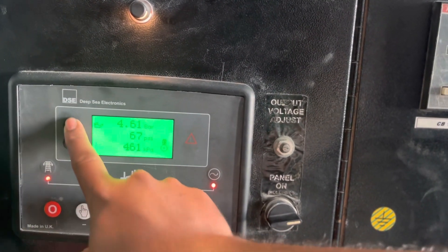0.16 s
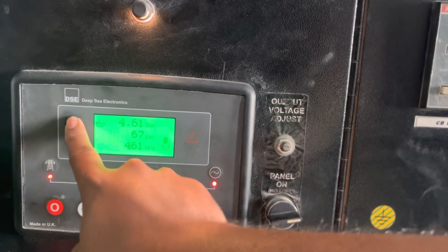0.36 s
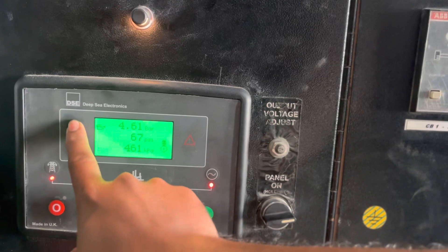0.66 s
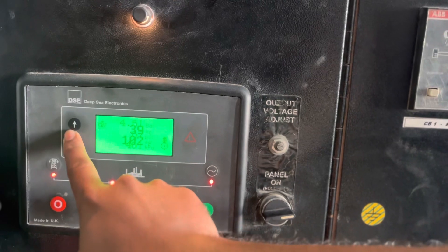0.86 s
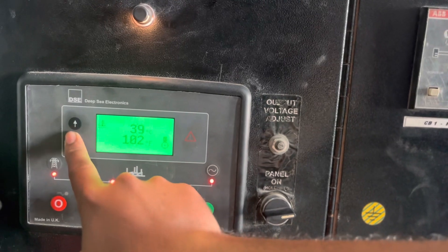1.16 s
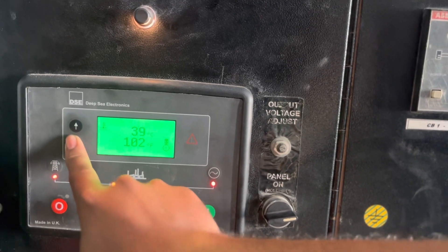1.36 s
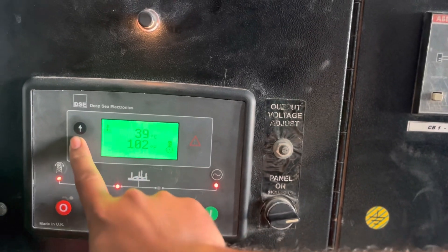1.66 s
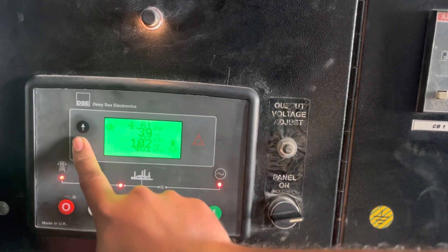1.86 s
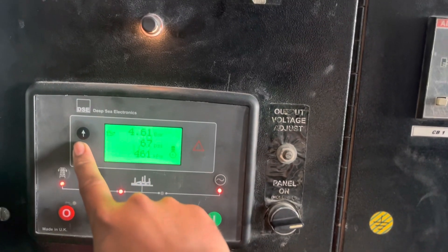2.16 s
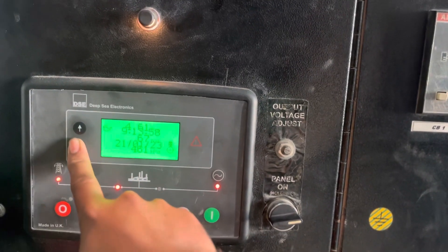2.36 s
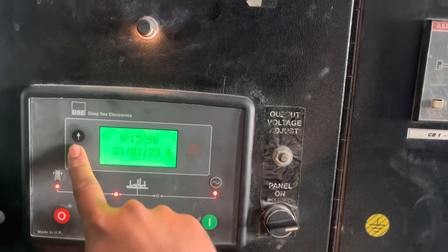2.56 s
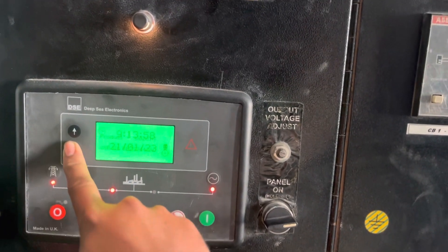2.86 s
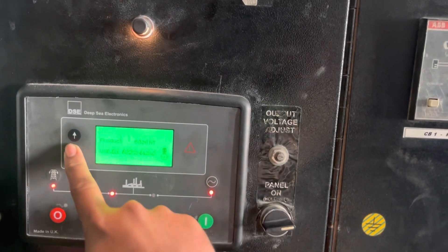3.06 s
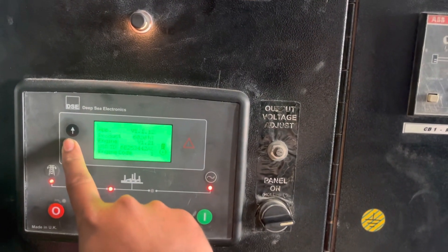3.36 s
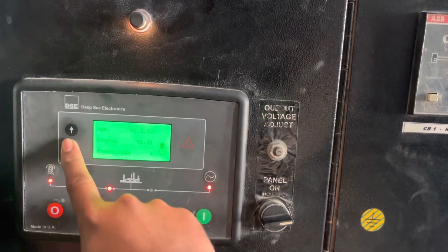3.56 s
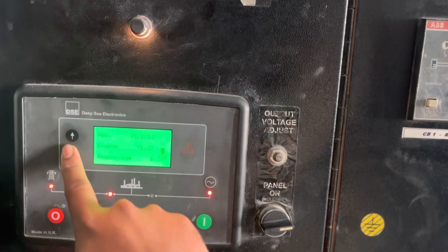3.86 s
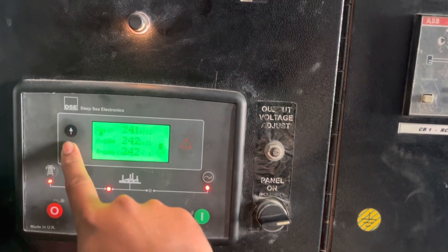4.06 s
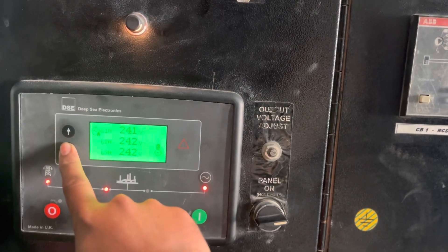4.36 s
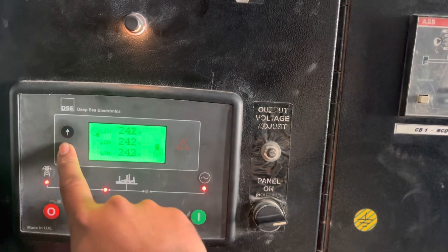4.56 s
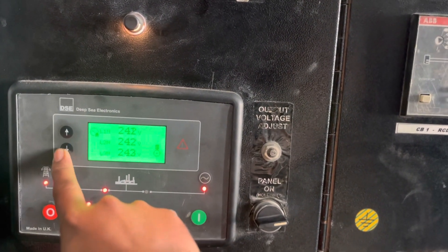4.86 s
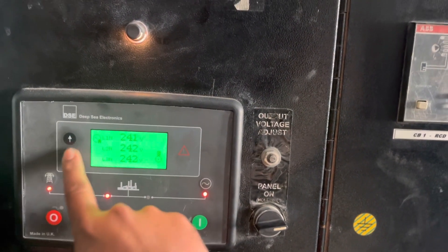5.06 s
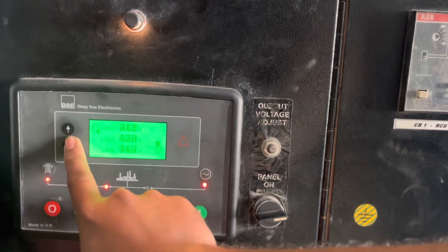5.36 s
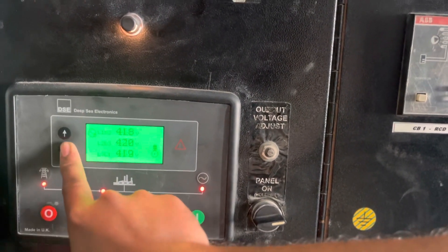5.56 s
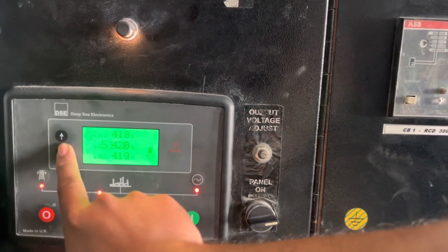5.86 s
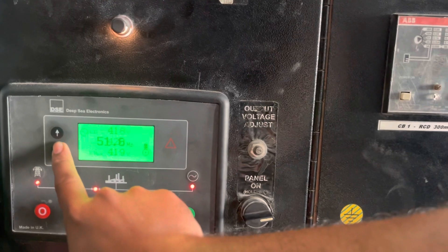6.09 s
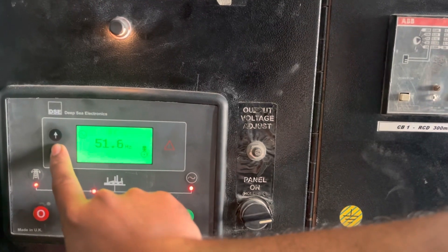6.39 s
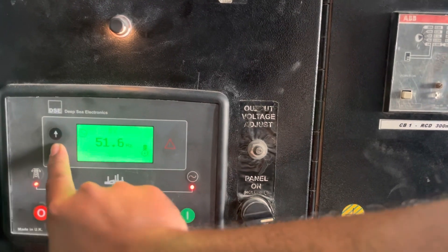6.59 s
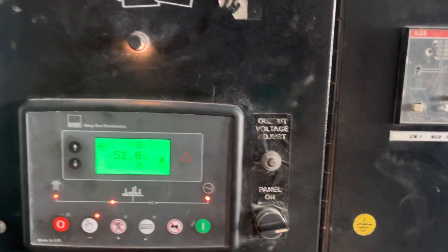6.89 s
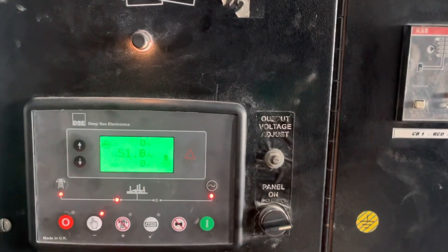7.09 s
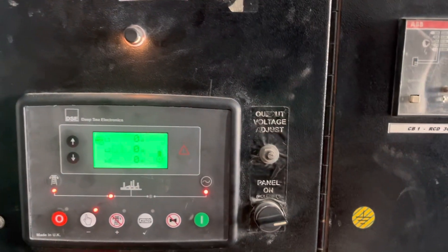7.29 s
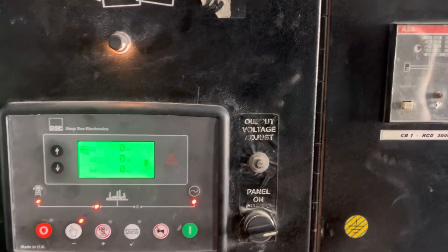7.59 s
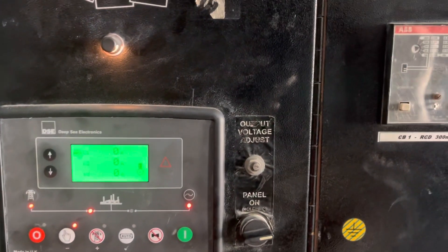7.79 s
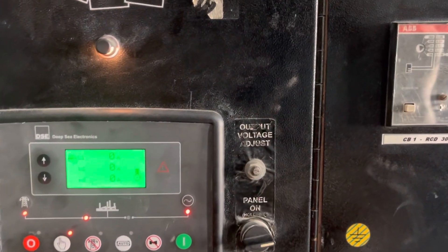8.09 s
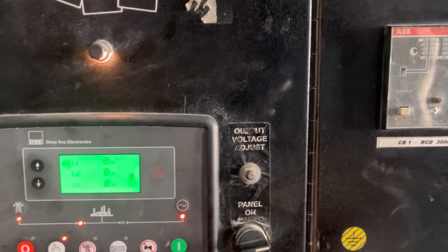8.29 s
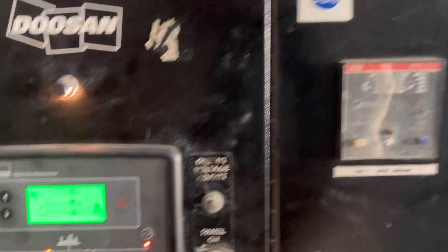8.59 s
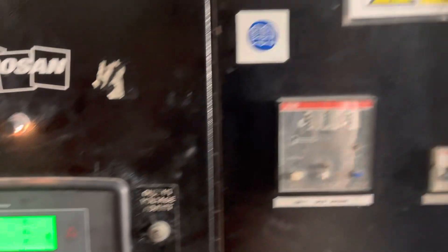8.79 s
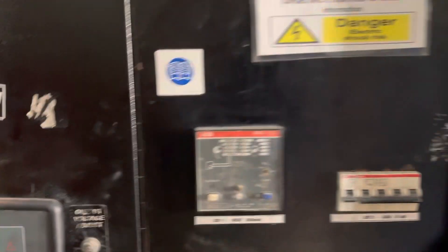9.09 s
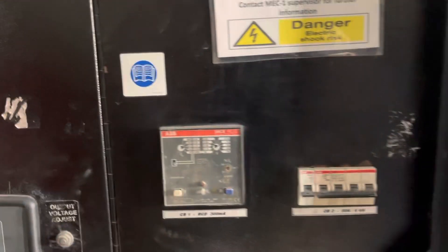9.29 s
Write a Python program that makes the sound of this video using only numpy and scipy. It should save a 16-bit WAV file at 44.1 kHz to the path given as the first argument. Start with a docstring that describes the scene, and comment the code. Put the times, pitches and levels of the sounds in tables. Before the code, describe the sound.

A steady four-cylinder diesel engine heard in stereo from a close handheld microphone at its steel canopy. Low body boom, mid-range sheet-metal hum, fan whir and broadband hiss are continuous, overlaid with blurred clatter and a very fast metallic rattle. Speed never changes. Late on, one harder tick is followed by a small squeak and a brief rough scrape; in the last second the panel hum drops while diffuse wall reflections remain.

```python
"""By the control panel of a four-cylinder diesel generator that runs at governed speed in its steel canopy.
Engine orders, sines locked to the crank, hum through the sheet metal; filtered noise adds rumble and clatter.
A loose part rattles once a turn as struck resonances; a belt-driven fan drones in sines and hisses in noise.
Late on the loose part gives one harder, brighter tick, then come a faint squeak and a faint scrape.
Near the end the microphone drifts away along the panel and the panel hum fades."""
import sys
import numpy as np
from scipy import signal
from scipy.fft import rfft, irfft, next_fast_len
from scipy.io import wavfile
from scipy.ndimage import uniform_filter1d

SR = 44100
rng = np.random.default_rng(int(sys.argv[2]) if len(sys.argv) > 2 else 0)


def master_out(mix):
    """Clip the mix to full scale and print it as 16-bit PCM to the path in sys.argv[1]."""
    frames = np.transpose(np.atleast_2d(mix))
    ceiling = np.clip(frames, -1, 1)
    pcm = np.round(ceiling * 32767).astype(np.int16)
    wavfile.write(sys.argv[1], SR, pcm)


N = 416304

TURNS_PER_S = 25.7996  # mean crank speed
FAN_HZ = 36.66  # fan fundamental
HUM_DB, LEAN_DB, RATTLE_DB, UPPER_DB = 1, 2, 3, 4  # columns of the microphone path in place()


def amp(db):
    """Level to amplitude: 20 dB is a factor of ten."""
    return np.exp(np.asarray(db) * np.log(10) / 20)


def read(points, hz):
    """Linear interpolation of a table along a logarithmic frequency axis."""
    f, value = np.transpose(points)
    return np.interp(np.log(hz + 1), np.log(f + 1), value)


def place(column):
    """Position dependence of the near field: one column of the microphone path, per sample."""
    # drift of the microphone along the panel:
    # t/s, panel hum level/dB, panel left-right lean/dB, rattle level/dB, upper-order level/dB
    path = [(0, -0.5, -0.5, -6, -4), (.6, -1.5, 1, -7.5, -3), (1.2, 0.5, 0, -1.5, -1.5),
            (2.5, 0, 0.7, 0, 0), (6.6, 0, -0.5, 0.5, 1), (7.1, -1, 3, -0.5, 0), (8.3, -2.5, 3.5, -0.5, 0),
            (8.8, -6, 1, 0, -1.5), (9.44, -8, 0.5, -4, -16)]
    rows = np.transpose(path)
    return np.interp(np.arange(N) / SR, rows[0], rows[column])


def boom_db():
    """Body radiation against position: falls with the square of the panel hum change in dB."""
    return -.041 * place(HUM_DB) ** 2


def wash_db():
    """Reflected against direct sound: the wall wash rises .21 dB per dB of panel hum lost."""
    return -.21 * place(HUM_DB)


def wander(top_hz):
    """Random modulation of unit rms by superposition of slow sines in random phase."""
    t = np.arange(0, N + 64, 64) / SR
    rates = np.geomspace(top_hz / 8, top_hz, 12)
    slow = sum(np.sin(2 * np.pi * (f * t + rng.random())) for f in rates) / np.sqrt(6)
    return np.interp(np.arange(N) / SR, t, slow)


def coloured(white, spectrum):
    """Spectral shaping: multiplies white noise of unit power by a spectral density in dB per Hz."""
    size = next_fast_len(N)
    gain = amp(read(spectrum, np.fft.rfftfreq(size, 1 / SR)))
    return irfft(rfft(white, size) * gain * np.sqrt(SR / 2), size)[..., :N]


def ports(shared, unrelated):
    """Interchannel coherence: two microphone ports hear a frequency-dependent mix of two sounds."""
    # likeness of left and right: f/Hz, correlation [0 to 1]
    likeness = [(60, 0.93), (250, 0.93), (500, 0.93), (1000, 0.099), (2500, 0.38), (5000, 0.051),
                (7000, 0.53), (7700, 1), (10200, 0.67), (12000, 0.29)]
    # phase by which left leads right: f/Hz, lead/rad
    phase_lead = [(0, 0), (260, .2), (1210, 2.2), (2500, -.5), (4570, -.6), (5600, -3.2), (6370, -3.4),
                  (7320, -1.9), (7670, -.1), (10200, .1), (16000, .1)]
    # left-right balance: f/Hz, level difference/dB
    balance = [(60, -3), (110, 0.5), (200, -10), (380, -16), (700, -4), (1290, -1.5), (2380, -1.5),
               (4400, -5), (8120, 0), (15000, 2)]
    size = next_fast_len(N)
    hz = np.fft.rfftfreq(size, 1 / SR)
    a, b = rfft(shared, size), rfft(unrelated, size)
    same = np.clip(read(likeness, hz), 0, 1)
    # each port takes half of the level and phase difference
    tilt = amp(read(balance, hz) / 2) * np.exp(.5j * read(phase_lead, hz))
    left = a * tilt
    right = (same * a + np.sqrt(1 - same ** 2) * b) / tilt
    return irfft(np.array([left, right]), size)[:, :N]


def crank():
    """Rotation at constant mean speed plus slow phase sway: crank angle in turns."""
    # the governor lets the crank run ahead or behind: t/s, lead [turns]
    sway = [(0, -.003), (.7, -.008), (1.3, -.009), (2.3, -.003), (3.05, .011), (3.5, .006), (4.1, -.008),
            (4.35, -.008), (4.7, -.002), (5.1, -.003), (5.6, .003), (6, .003), (6.6, -.005), (7.3, .003),
            (7.8, .001), (8.5, -.008), (9.1, -.028), (9.44, -.031)]
    first_turn_s = .0327  # nominal time of the first rattle
    t = np.arange(N) / SR
    lead = uniform_filter1d(np.interp(t, *np.transpose(sway)), size=6000)
    return (t - first_turn_s) * TURNS_PER_S + lead


def order_phase(k, hz):
    """Dispersion: starting phase in radians of the order with k cycles per two turns."""
    if hz < 275:
        # in the body, the higher the order, the later it leaves
        body_hz, body_lag = 51.6, .000123  # lag in s per Hz
        # orders between the firing orders arrive late, and their upper half orders inverted
        off_firing_s, invert_hz = .00155, 155
        late = 2 * hz * off_firing_s * (k % 4 > 0)
        return -np.pi * (body_lag * (hz - body_hz) ** 2 + late + (k % 2) * (hz > invert_hz))
    if not 350 < hz < 575:
        return 2 * np.pi * rng.random()
    # the panel rings around panel_hz, and higher orders leave it later
    panel_hz, panel_lag, flip_hz = 441, .000335, 490  # lag in s per Hz
    # past flip_hz the phase advances half a cycle per whole order, one cycle at most
    flip = np.clip((hz - flip_hz) / TURNS_PER_S, 0, 2)
    # half orders stand a quarter wave off: alternate turns differ in timing, not in strength
    start = np.pi * (flip - k % 2 / 2 - panel_lag * (hz - panel_hz) ** 2) - .25
    return start - np.pi / 2 if hz > 530 else start


def hum(turns):
    """Harmonic radiation of a periodic engine: low orders boom from the body, high ones ring in the panel."""
    # engine orders before changes with place and chance:
    # multiple of the turn rate, level/dB, left-right difference/dB
    turn_orders = [(2.0, -24.3, 0), (2.5, -48.2, -2), (3.0, -33.9, 1), (3.5, -40.5, -1), (4.0, -27.4, -1),
                   (4.5, -48.4, 0), (5.0, -49.2, -4), (5.5, -44.7, -1), (6.0, -37.3, -2), (6.5, -45.7, -1),
                   (7.0, -58.6, 2), (7.5, -49.5, -1), (8.0, -30.4, -1), (8.5, -39.5, -1), (9.0, -38.5, 1),
                   (9.5, -56.2, 4), (10.0, -32.8, -2), (10.5, -48.3, 2), (11.0, -44.4, 2),
                   (11.5, -55.3, -5), (12.0, -47.0, -8), (12.5, -60.6, -7), (13.0, -48.2, -2),
                   (13.5, -49.5, -1), (14.0, -33.1, -3), (14.5, -47.0, 0), (15.0, -31.0, -3),
                   (15.5, -41.1, -8), (16.0, -31.7, 1), (16.5, -40.1, -2), (17.0, -30.2, -1),
                   (17.5, -45.8, -5), (18.0, -33.7, -6), (18.5, -45.2, -4), (19.0, -31.2, -3),
                   (19.5, -42.4, -5), (20.0, -29.9, -3), (20.5, -46.6, -3), (21.0, -42.2, 4),
                   (21.5, -42.2, -3), (22.0, -46.2, -6), (22.5, -48.5, -1), (23.0, -44.6, -4),
                   (23.5, -53.1, -2), (24.0, -49.7, -3), (24.5, -56.6, 3), (25.0, -46.5, -8),
                   (26.0, -54.2, -6), (26.5, -54.5, 8), (27.0, -57.8, 6), (27.5, -62.2, 0), (28.0, -49, -2),
                   (28.5, -61.9, -3), (29.0, -57.2, 8), (30.0, -56.9, -7), (30.5, -57.9, 8),
                   (31.0, -60.8, -2), (31.5, -56.9, -4), (32.0, -57.3, -2), (32.5, -53.4, 3),
                   (33.0, -57.5, -8), (33.5, -58.8, -1), (34.0, -54.7, -3), (34.5, -60.4, -1),
                   (35.0, -59.3, 7), (35.5, -59.5, 3), (36.0, -58.0, -3), (36.5, -61.2, -1),
                   (37.0, -62.4, 8), (38.0, -54, 1), (39.0, -61.8, -7)]
    port_delay_s = .00029  # left ahead of right, full above 450 Hz
    flutter_db = -21  # each sideband at order 17; its amplitude grows with the order
    out = np.zeros((2, N))
    near_db, lean_db, upper_db = place(HUM_DB), place(LEAN_DB), place(UPPER_DB)
    body_db, wall_db = boom_db(), wash_db()
    beat = np.exp(2j * np.pi * (FAN_HZ - TURNS_PER_S) * np.arange(N) / SR)
    for turn, db, side_db in turn_orders:
        k = round(2 * turn)  # cycles per two turns; odd k is a half order
        hz = k * TURNS_PER_S / 2
        panel = np.clip((hz - 358) / 45, 0, 1) * (hz < 620)
        boom = np.clip((hz - 55) / 40, 0, 1) * (hz < 275)
        start = order_phase(k, hz)

        place_db = panel * near_db + boom * body_db
        place_db = place_db + (275 < hz < 335) * 2 * wall_db + (620 < hz < 760) * upper_db
        place_db = place_db + (hz > 760) * (2 * np.minimum(wall_db, .8) + body_db)
        chance_db = (.42 + k % 2) * min(k / 12, 1) * wander(5)
        level = np.sqrt(2) * amp(db + place_db + chance_db)

        lead = .1 + np.pi * hz * port_delay_s * min(hz / 450, 1)  # half the phase between ports
        port = amp(side_db / 2) * np.exp(1j * lead)
        gain = level / max(abs(port + 1 / port) / 2, .6)  # refers the level to the sum of both ports
        lean = abs(port) * amp(panel * lean_db / 2)
        wave = gain * np.exp(1j * (np.pi * k * turns + start))
        if k % 2 == 0 and 375 < hz < 760:
            # whole orders in the panel flutter at the beat of fan against crank
            up, down = np.exp(2j * np.pi * rng.random(2))
            wave = wave * (1 + amp(flutter_db) * turn / 17 * (up * beat + down / beat))
        out[0] += lean * (wave * np.exp(1j * lead)).real
        out[1] += (wave * np.exp(-1j * lead)).real / lean
    return out


def fan():
    """Harmonic tones of a belt-driven rotor, with random wavering of amplitude and phase."""
    # fan orders before wavering and place: multiple of the fan fundamental, level/dB
    fan_orders = [(2, -44), (3, -49), (4, -38.5), (5, -44), (6, -41), (7, -51), (23, -62)]
    t = np.arange(N) / SR - .0043
    tone = np.zeros(N)
    for k, db in fan_orders:
        level = amp(db + wander(3.0)) * np.sqrt(2)
        tone += level * np.cos(2 * np.pi * k * FAN_HZ * t + .15 * wander(2.5))
    return tone * amp(boom_db()) * np.ones((2, 1))


def rumble():
    """Random excitation of the body: uneven firings blur into low noise."""
    # spectrum before place and chance: f/Hz, level/dB [per Hz]
    body_spectrum = [(20, -72), (42, -70), (70, -62), (98, -50.5), (125, -58.5), (145, -57.5), (200, -60),
                     (240, -64.5), (300, -76.5), (500, -130)]
    return coloured(rng.standard_normal((2, N)), body_spectrum) * amp(boom_db() + .4 * wander(4.0))


def drone():
    """Random excitation of the panel: uneven firings blur into a band of noise."""
    # spectrum before place and chance: f/Hz, level/dB [per Hz]
    panel_spectrum = [(250, -120), (340, -70), (390, -63.5), (470, -61.5), (550, -65), (640, -77),
                      (900, -120)]
    return coloured(rng.standard_normal((2, N)), panel_spectrum) * amp(place(HUM_DB) + .68 * wander(8.9))


def hiss(turns):
    """Broadband noise, amplitude-modulated slightly once a turn and at random."""
    # spectrum of the broadband hiss: strong to 10 kHz, almost empty near 12-13.6 kHz, faint above:
    # f/Hz, level/dB [per Hz]
    hiss_spectrum = [(700, -110), (1200, -81), (2400, -79), (4000, -82), (5200, -86), (6700, -90),
                     (8000, -93), (9600, -90), (11000, -101), (11800, -124), (13600, -124), (14200, -106),
                     (15700, -102)]
    swell_db = .21 * np.cos(2 * np.pi * turns - .6) + .43 * wander(12)
    return coloured(rng.standard_normal((2, N)) * amp(swell_db), hiss_spectrum)


def wall_wash():
    """Diffuse reflection: engine noise returns from the workshop walls as steady coloured noise."""
    # spectrum before changes with place: f/Hz, level/dB [per Hz]
    wall_spectrum = [(180, -100), (285, -64.5), (335, -70), (420, -67.5), (600, -64.5), (850, -69.5),
                     (980, -68), (1200, -81.5), (1600, -130)]
    return coloured(rng.standard_normal((2, N)), wall_spectrum) * amp(wash_db())


def clatter(turns):
    """Cyclostationary noise: valve gear clatter that partly repeats each cycle, knocked by every firing."""
    # spectrum of the valve gear before knocks and place: f/Hz, level/dB [per Hz]
    valve_spectrum = [(850, -110), (1050, -72), (1150, -70.5), (1210, -76.5), (1350, -70.5), (1500, -73.5),
                      (1580, -70.5), (1680, -74), (2000, -76.5), (2400, -90), (3500, -130)]
    delay, fall_db, grain_db = .08, 5.5, 1.4  # delay in firings; fall over one firing; grain rms
    size = round(2 * SR / TURNS_PER_S)  # samples in one cycle of two turns
    grain = uniform_filter1d(rng.standard_normal(size), size=60, mode="wrap") * np.sqrt(60)
    spot = (turns / 2 % 1 * size).astype(int)
    repeat = .68 + .04 * place(HUM_DB)  # amplitude of the repeating part, drops as the panel hum fades
    repeated = rng.standard_normal((2, size))[:, spot]
    fresh = rng.standard_normal((2, N))
    drive = repeat * repeated + np.sqrt(1 - repeat ** 2) * fresh
    knock_db = grain_db * grain[spot] - fall_db * ((2 * turns - delay) % 1 - .5)
    return coloured(drive * amp(knock_db + 1 + .3 * place(HUM_DB)), valve_spectrum)


def knocks(turns):
    """Impulse response of damped modes: short rings stand out of the valve gear once a cycle."""
    # knocks once every two turns, before a 2.5 dB lift, onset, chance and place:
    # delay after an even turn [turns], f/Hz, decay time t60/s, peak level/dB
    cycle_knocks = [(.22, 2200, .016, -45), (.5, 1580, .04, -43), (1.38, 1200, .025, -42),
                    (1.53, 1610, .03, -39), (1.61, 850, .02, -40)]
    t, out = np.arange(2000) / SR, np.zeros(N)
    for after, hz, t60, db in cycle_knocks:
        blows = np.diff(np.floor((turns - after) / 2), prepend=-1) * amp(1.5 * rng.standard_normal(N))
        onset = np.minimum(t / .00085, 1)
        ring = onset * amp(db - 60 * t / t60 + 2.5) * np.sin(2 * np.pi * hz * t)
        out += signal.oaconvolve(blows, ring)[:N]
    return out * amp(.6 * place(HUM_DB) + np.array([[-1.], [1.]]))  # right 2 dB above left


def ring_db(hz):
    """Modal directivity: level change of one rattle mode as the microphone drifts."""
    # modes that come and go with the place: f/Hz
    ring_hz = [3710, 4560, 4930, 5290]
    # their levels: t/s, then level/dB of each of these modes in turn
    ring_path = [(0, -1.5, -3, 2, -7), (2.2, 0, 5.5, 2, 1), (3.6, 1, 2, 6, -10), (5.2, 1, 0, 1.5, -8),
                 (6.4, 3, -4, 2, -5), (6.9, 3, -3, 1, 10), (7.6, 0, -1, -1, 4), (9.44, -4, -7, -4, 2)]
    if hz not in ring_hz:
        return 0
    rows = np.transpose(ring_path)
    return np.interp(np.arange(N) / SR, rows[0], rows[1 + ring_hz.index(hz)])


def rattle(turns):
    """Impact excitation: a loose part knocks and bounces once a turn and small steel modes ring."""
    # impacts after each turn, before chance: t/s, level on even turns/dB, level on odd turns/dB
    bounces = [(0, 0, 0), (.005, -9, -9), (.0085, -7, -7), (.029, -19, -9)]
    # steel modes: f/Hz, bandwidth/Hz, relative level/dB
    steel_modes = [ (2607, 31, 0), (3290, 17, -8), (3560, 30, -9), (3710, 85, -4.5), (3910, 73, -15.5),
                   (4560, 78, -5), (4930, 80, -4), (5290, 110, -8.5), (7100, 36, -9.5), (7700, 160, -26.5),
                   (9040, 130, -23)]
    # spectral weighting of bursts and modes: f/Hz, level/dB [per Hz at unit drive]
    knock_spectrum = [(1800, -105), (3000, -87.5), (5000, -89), (6600, -86.5), (8500, -91.5),
                      (10500, -94.5), (11800, -125)]
    at = np.flatnonzero(np.diff(np.floor(turns)) > 0)
    odd = np.floor(turns[at + 1]) % 2
    luck = rng.standard_normal((len(at), 1 + 2 * len(bounces)))
    blows = np.zeros(N + SR)
    for j, (s, even_db, odd_db) in enumerate(bounces):
        timing, force = luck[:, 1 + 2 * j], luck[:, 2 + 2 * j]
        spot = (at + SR * (s * (1 + .04 * timing) + .0002 * abs(timing))).astype(int)
        blows[spot] += amp(np.where(odd, odd_db, even_db) + .6 * luck[:, 0] + .6 * force)
    t = np.arange(3000) / SR
    strength = amp(place(RATTLE_DB))
    decay = amp(-60 * t / .032) + .4 * amp(-60 * t / .086)  # fast and slow decay, t60 in s
    burst = signal.oaconvolve(blows, decay)[:N]
    tick = blows[:N]
    drive = strength * (burst * rng.standard_normal((2, N)) + amp(20) * tick)
    struck = .35 * drive + amp(17) * strength * tick
    modes = np.zeros((2, N))
    for hz, width, db in steel_modes:
        resonance = signal.iirpeak(hz, hz / width, SR)
        modes += amp(db + ring_db(hz)) * signal.lfilter(*resonance, struck)
    return coloured(drive + amp(20.5) * modes, knock_spectrum)


def harder_tick():
    """Impact noise: one harder, brighter tick of the loose part on its usual turn, decaying exponentially."""
    t = np.arange(N) / SR - 6.7383
    bright = np.diff(rng.standard_normal(N + 2), 2) / np.sqrt(6)  # differencing lifts the treble
    return amp(-45 - 60 * abs(t) / .007) * (t > 0) * bright  # t60 of 7 ms


def squeak():
    """Frequency modulation: one brief, faint arched whistle with two fainter companions."""
    # glide of the main whistle: t/s, f/Hz, level/dB
    glide = [(6.765, 1055, -58), (6.795, 1095, -44), (6.835, 1130, -46.5), (6.865, 1115, -44),
             (6.905, 1075, -56)]
    # the whistle and its companions: pitch ratio, relative level/dB
    partials = [(1, 0), (0.72, -5), (2.8, -14)]
    s, hz, db = np.transpose(glide)
    t = np.arange(N) / SR
    angle = 2 * np.pi * np.cumsum(np.interp(t, s, hz)) / SR
    tone = sum(amp(part_db) * np.sin(ratio * angle) for ratio, part_db in partials)
    return amp(np.interp(t, s, db, -140, -140)) * np.sqrt(2) * tone


def scrape():
    """Random frequency modulation: jitter of the pitch makes a brief, faint whistle rough."""
    # glide of the whistle before jitter: t/s, f/Hz, level/dB
    glide = [(7.02, 3600, -70), (7.03, 3500, -47), (7.052, 3540, -48), (7.066, 3620, -70)]
    s, hz, db = np.transpose(glide)
    t = np.arange(N) / SR
    rough = 1 + .25 * uniform_filter1d(rng.standard_normal(N), size=100)
    angle = 2 * np.pi * np.cumsum(rough * np.interp(t, s, hz)) / SR
    return amp(np.interp(t, s, db, -140, -140)) * np.sqrt(2) * np.sin(angle)


def scene():
    """Linear superposition of all parts of the running set."""
    turns = crank()
    noise = rumble() + drone() + hiss(turns) + wall_wash() + clatter(turns) + rattle(turns)
    tones = hum(turns) + fan() + knocks(turns)
    return tones + ports(*noise) + harder_tick() + squeak() + scrape()


def record(dry):
    """Band limitation: a linear-phase low-pass filter with its edge at 15.8 kHz."""
    low_pass = signal.firwin(511, 15800, window=("kaiser", 9), fs=SR)
    return signal.oaconvolve(dry, low_pass[None], "same")


dry = scene()
out = record(dry)
master_out(out)
```